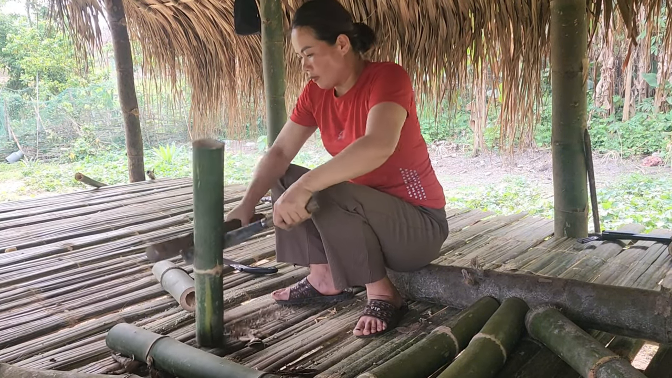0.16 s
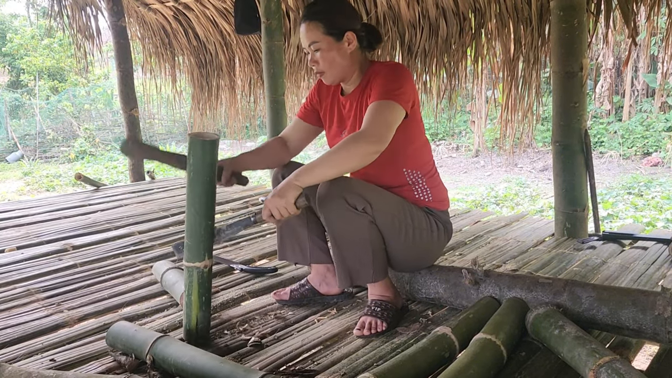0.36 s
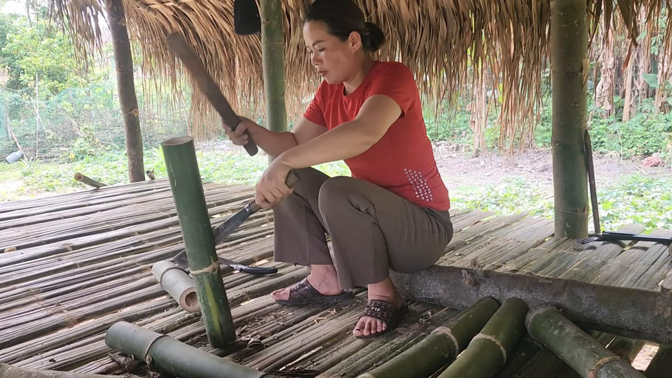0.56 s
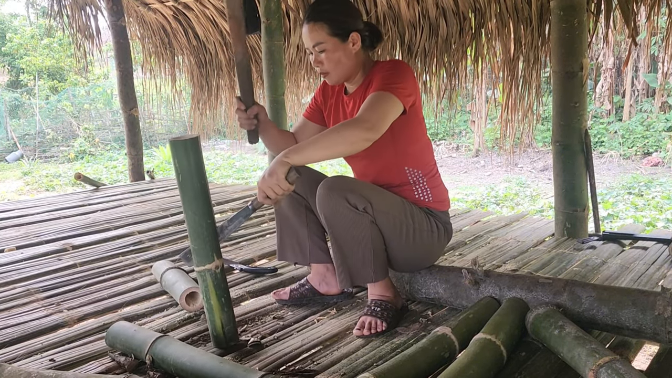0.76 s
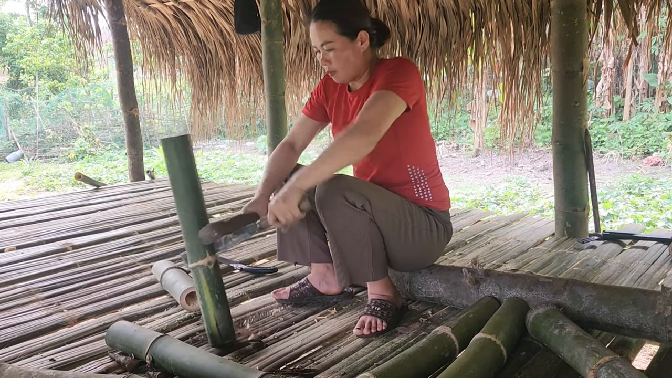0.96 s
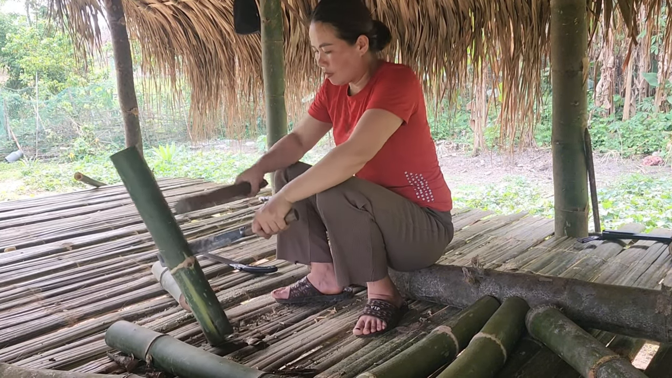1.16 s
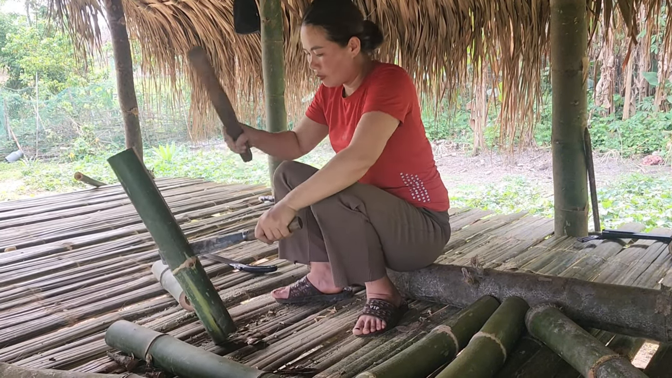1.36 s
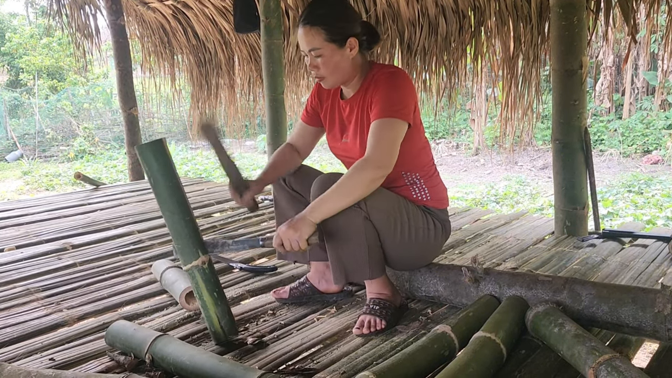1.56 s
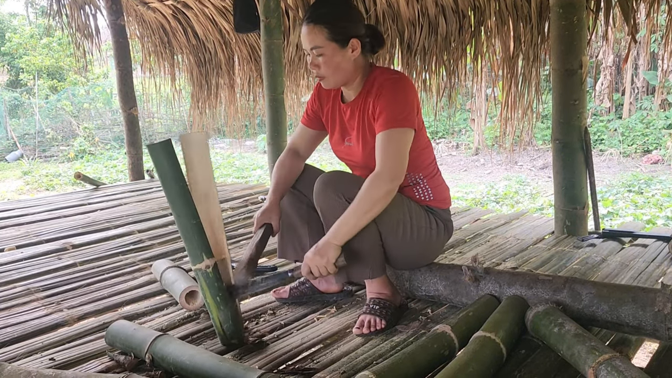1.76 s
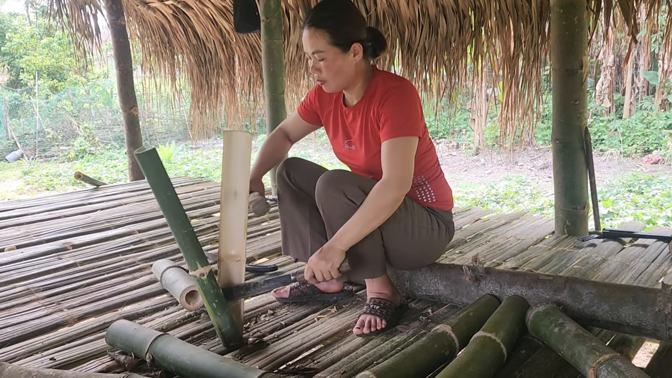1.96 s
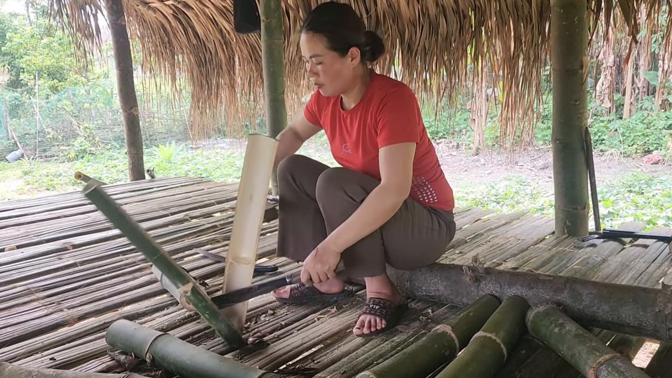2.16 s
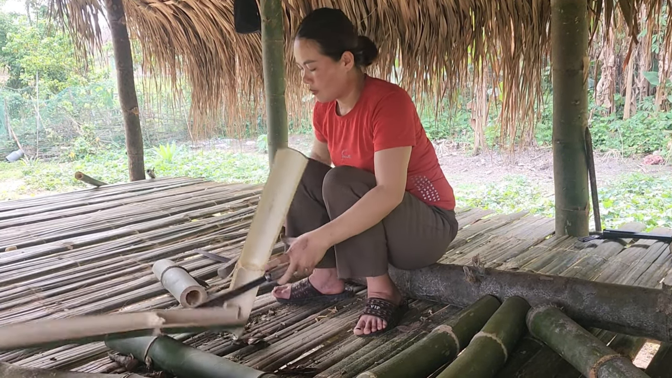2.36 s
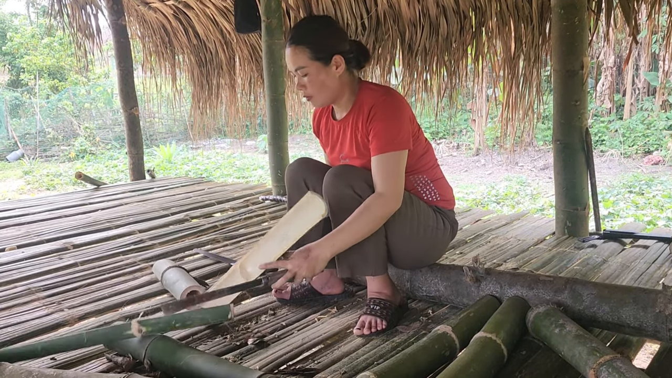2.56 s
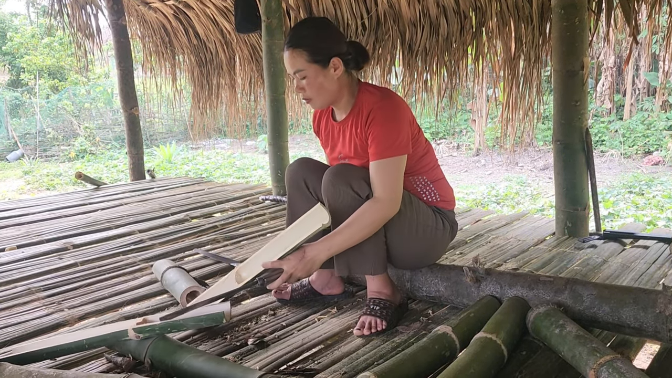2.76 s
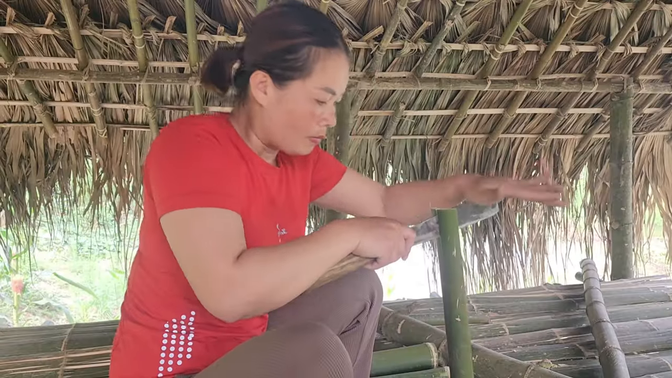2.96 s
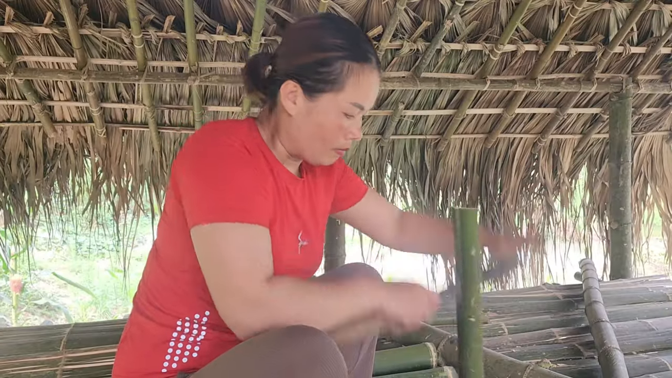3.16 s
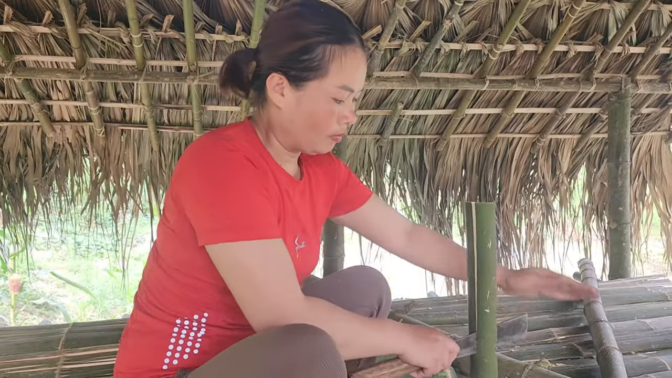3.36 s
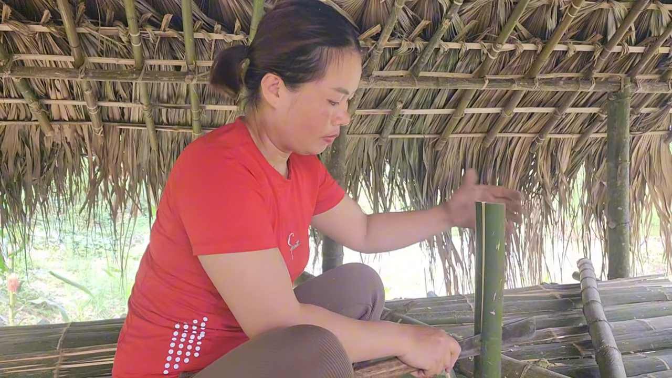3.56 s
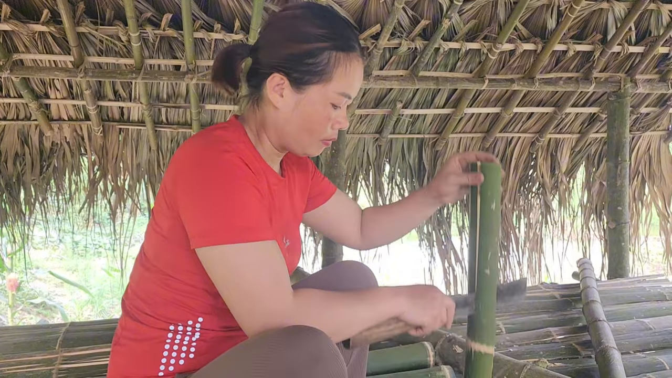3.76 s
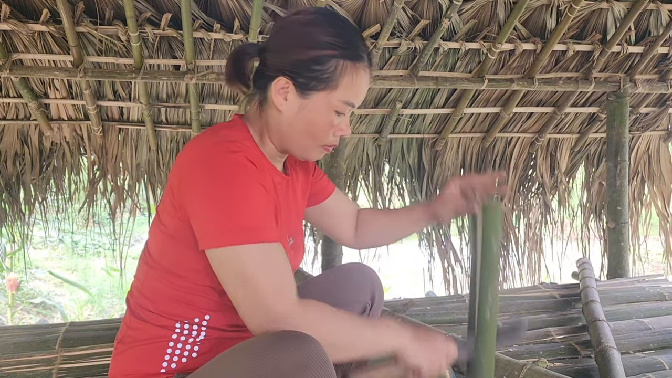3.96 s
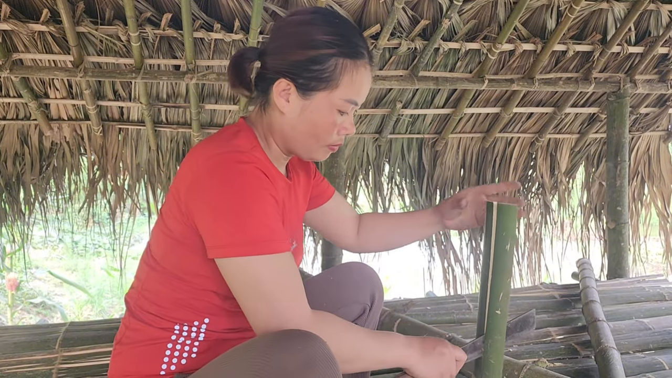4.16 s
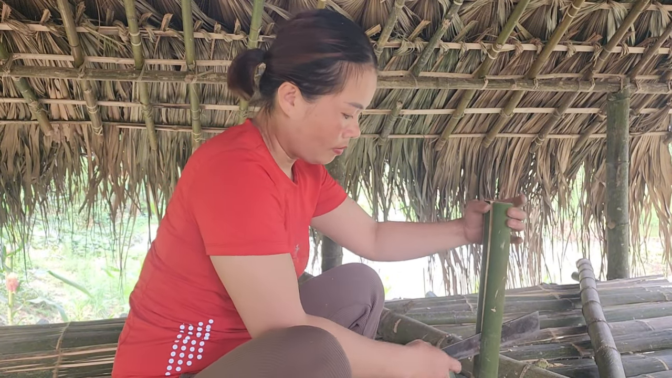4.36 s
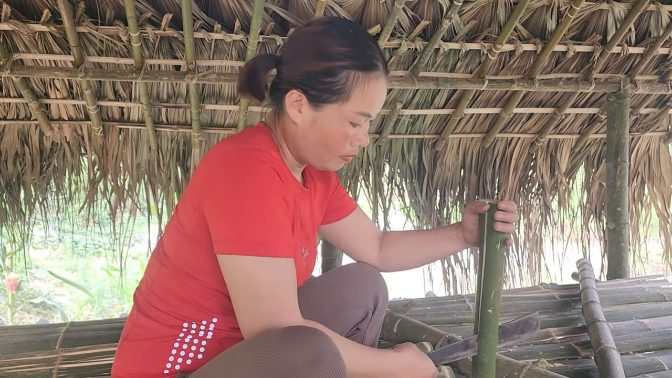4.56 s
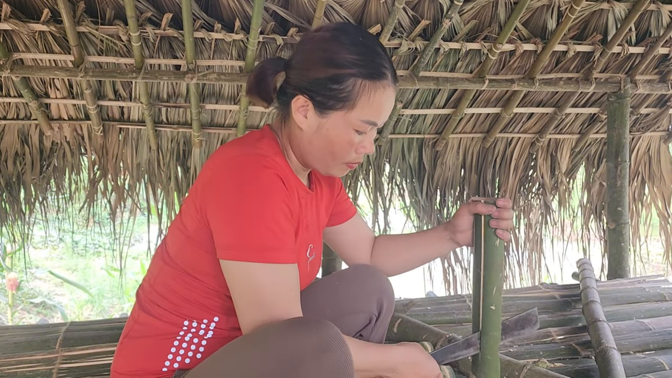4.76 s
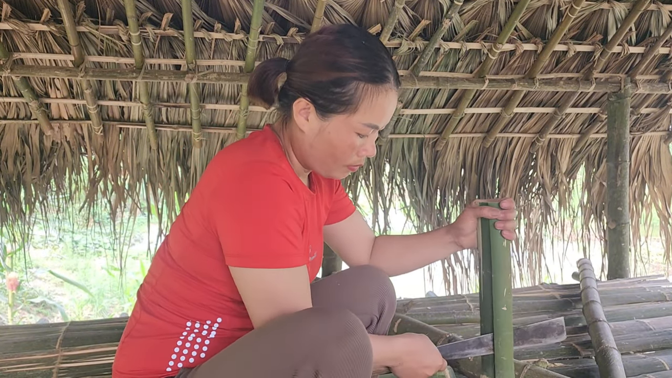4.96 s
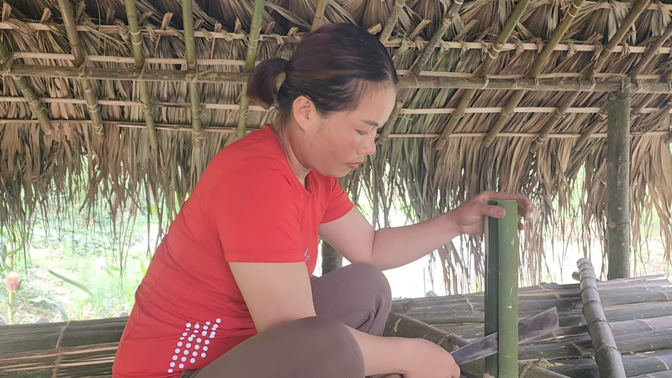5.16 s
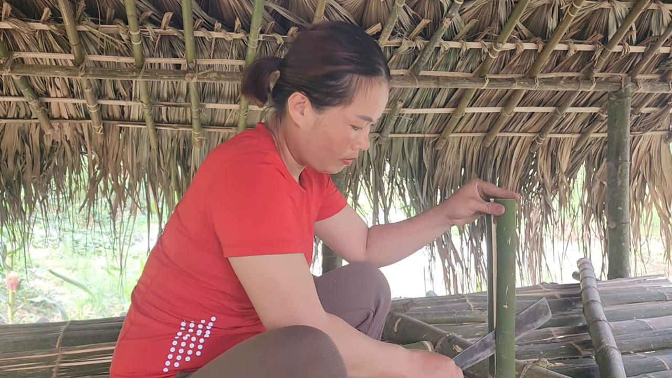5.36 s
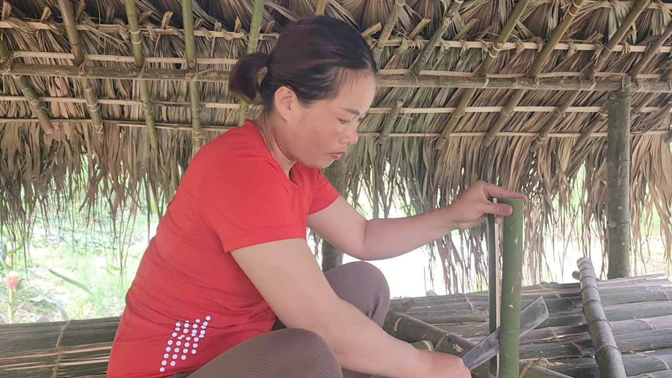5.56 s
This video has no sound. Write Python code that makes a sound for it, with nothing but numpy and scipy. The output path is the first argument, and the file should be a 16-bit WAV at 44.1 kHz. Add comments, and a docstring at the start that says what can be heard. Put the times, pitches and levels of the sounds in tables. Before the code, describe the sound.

In an open rural shelter, with a faint high insect hiss and a few far birds, bamboo is being split. Three dry knocks of a club on a machete come first, followed by the hollow, ringing clatter of a piece falling on slats. Then, nearer the stereo microphones, another cane crackles, takes one heavy knock that shakes the deck, and snaps and tears loudly as the blade twists.

```python
"""A slatted deck under a thatched roof, insects and faint birds in the fields around, on a close stereo pair.
A wooden club drives a machete down green bamboo in three blows, each cracking the culm and shaking the deck.
Fibres tear, and a stave topples, ringing and scraping as it bounces on the slats.
After a brief silence, from closer by: the blade is worked into another culm, knocked down,
and twisted until the fibres snap and tear."""
import sys
import numpy as np
from scipy import signal
from scipy.fft import rfft, irfft
from scipy.io import wavfile
from scipy.ndimage import uniform_filter1d

SR = 44100
rng = np.random.default_rng(int(sys.argv[2]) if len(sys.argv) > 2 else 0)


def wrap_up_sound(samples):
    """Save the sound to the file named by the first command line argument, as 16-bit audio."""
    columns = np.atleast_2d(samples).T
    # keep every value between -1 and 1, then stretch to whole-number steps
    tamed = np.clip(columns, -1, 1)
    steps = np.round(tamed * 32767).astype(np.int16)
    wavfile.write(sys.argv[1], SR, steps)


N = 251370
T = np.arange(SR // 2) / SR  # time within one short sound, s


def amp(db):
    """Decibels to gain."""
    return 10 ** (np.asarray(db) / 20)


def unit(x):
    """Scales to an rms of one."""
    return x / np.sqrt(np.mean(x ** 2) + 1e-20)


def read(points, hz):
    """Reads a table along a logarithmic frequency axis."""
    freqs, values = np.transpose(points)
    return np.interp(np.log(hz + 1), np.log(freqs + 1), values)


def add(mix, start_s, sound):
    """Mixes a stereo sound in at start_s."""
    part = mix[:, max(round(start_s * SR), 0):][:, :sound.shape[1]]
    part += sound[:, :part.shape[1]]


# How alike the two microphones hear the work: freq_hz, coherence
MIC_COHERENCE = [(100, 1), (400, 0.85), (1000, 0.8), (3000, 0.41), (8000, 0.17), (16000, 0.14)]
def coloured(pair, spectrum, diffuse=False, bass_db=0, treble_db=0):
    """Gives two unrelated signals one spectrum, the likeness of two close microphones and a tone tilt."""
    hz = np.fft.rfftfreq(pair.shape[1], 1 / SR)
    first, second = rfft(pair)
    coherence = np.sinc(hz / 1500) if diffuse else read(MIC_COHERENCE, hz)
    mid, side = first * np.sqrt(1 + coherence), second * np.sqrt(1 - coherence)
    shaped = np.array([mid + side, mid - side]) * amp(read(spectrum, hz)) * hz / np.hypot(hz, 20)
    shelves = amp(bass_db / (1 + (hz / 420) ** 4) + treble_db * hz ** 2 / (hz ** 2 + 5000 ** 2))
    return irfft(shaped * shelves, pair.shape[1]) / irfft(shaped).std()


def burst(spectrum, t60, bass_db=0, treble_db=0, hold_s=0):
    """Noise as a crowd of dense, unequal modes; the level holds for hold_s, then dies away."""
    t = T[:len(T) // 2]
    hz = np.fft.rfftfreq(len(t), 1 / SR)
    centres_hz = np.arange(0, SR / 2, 70)
    ripple_db = 2 * np.interp(hz, centres_hz, rng.standard_normal(len(centres_hz))) * hz / (hz + 1500)
    low_cut = hz ** 2 / (hz ** 2 + 40 ** 2)
    noise = coloured(rng.standard_normal((2, len(t))), spectrum, False, bass_db, treble_db)
    crowd = irfft(rfft(noise) * amp(ripple_db) * low_cut, len(t))
    envelope = amp(-60 * np.maximum(t - hold_s, 0) / t60) * (1 - np.exp(-t / 0.001))
    return np.pad(crowd * envelope, [(0, 0), (0, len(T) - len(t))])


def ring(modes, rise_s=0.00021):
    """Decaying modes; the higher ones reach the two microphones out of step."""
    out = np.zeros((2, len(T)))
    for hz, db, t60 in modes:
        phase, side = rng.random(2)
        skew = 0.8 * np.sign(side - .5) * np.arccos(read(MIC_COHERENCE, hz))
        out += amp(db - 60 * T / t60) * np.sin(2 * np.pi * (hz * T + phase) + np.array([[skew], [-skew]]))
    return out * (1 - np.exp(-T / rise_s))


def crackle(contour, spectrum, per_s, spread_db, grain_s=0.00098):
    """Tiny random ticks that follow a contour of (time_s, level_db); returns start time and sound."""
    times, levels_db = np.transpose(contour)
    t = np.arange(times[0], times[-1], 1 / SR)
    ticks = (rng.random(SR) < per_s / SR) * amp(spread_db * np.minimum(rng.exponential(1, SR), 3))
    grains = signal.lfilter([1], [1, -np.exp(-1 / (grain_s * SR))], ticks) * rng.standard_normal((2, SR))
    return times[0], coloured(grains, spectrum)[:, :len(t)] * amp(np.interp(t, times, levels_db))


def spurt(peak_s, db, rise_s, fade_s):
    """Level contour of a spurt: it builds to its height and dies away within 0.69 s."""
    return [(peak_s - rise_s, db - 14), (peak_s, db), (peak_s + min(fade_s, .69), db - 60)]


# The fields, heard from the farther and the closer position: freq_hz, density_db
FIELDS_FAR = [(20, -21.5), (50, -6), (100, -2.5), (250, -24.5), (1100, -23.5), (2000, -26), (3400, -25.5),
              (5600, -32), (6800, -24), (8250, -12), (9300, -20.5), (10500, -33.5), (13000, -37),
              (16000, -39.5)]
FIELDS_NEAR = [(15, -51.5), (25, -5.5), (53, 0), (108, -3), (190, -16.5), (249, -14.5), (531, -23.5),
               (988, -26), (2050, -23), (2760, -27), (3080, -22.5), (5570, -28), (8360, -7.5), (11000, -33),
               (16000, -34)]
def insects(spectrum, db, waver_db=0.52):
    """A steady chorus of insects over low moving air, gently wavering, all around the microphones."""
    t = np.arange(N) / SR
    waver = sum(np.sin(2 * np.pi * (hz * t + rng.random())) / np.sqrt(hz) for hz in np.geomspace(.7, 14, 12))
    return amp(db + waver_db * unit(waver)) * coloured(rng.standard_normal((2, N)), spectrum, diffuse=True)


def chirp(start_hz, end_hz, db, length_s=0.083):
    """A thin, slightly unsteady whistle, alike in both microphones."""
    glide = np.linspace(start_hz, end_hz, int(length_s * SR))
    waver = unit(uniform_filter1d(rng.standard_normal(SR), size=300))[:len(glide)]
    phase = 2 * np.pi * np.cumsum(glide * (1 + 0.0043 * waver)) / SR
    return np.ones((2, 1)) * amp(db) * np.hanning(len(glide)) * np.sin(phase)


# Two birds far out in the fields: start_s, interval_s, pitch_hz, level_db
BIRD_WHISTLES = [(0.0, .617, 2650, -75), (3.68, .87, 3050, -69.5)]
# A third distant bird: start_s, level_db
BIRD_SWEEPS = [(.042, -61), (.413, -62)]
def birds():
    """Two birds each whistle three times; a third sings high upward sweeps."""
    out = np.zeros((2, N))
    for start_s, interval_s, hz, db in BIRD_WHISTLES:
        for k in range(3):
            add(out, start_s + k * interval_s, chirp(hz, hz, db))
    for start_s, db in BIRD_SWEEPS:
        add(out, start_s, chirp(6900, 8200, db))
    return out


# Club on machete, the last blow from closer by; the culm's two rings change as the split deepens:
# start_s, crack_db, hold_s, crack_t60_s, deck_db, rebound_db,
# ring_t60_s, first_ring_hz, first_ring_db, second_ring_hz, second_ring_db
CLUB_BLOWS = [(0.1485, -10.5, 0.0019, 0.042, -31.5, -19.5, 0.031, 2023, -6.5, 3060, -12.5),
              (0.9324, -11, 0.005, 0.067, -33, -36.5, 0.04, 1050, -8, 562.7, -15.5),
              (1.625, -15, 0.00087, 0.079, -54, -45, 0.034, 780, -11, 612, -18.5),
              (3.9734, -11, 0.0013, 0.14, -16, -17.5, 0.062, 340, -8, 1464, -14)]
# The crack of the wood, one spectrum for each blow: freq_hz, density_db
CRACK_SPECTRA = [
    [(80, -2.5), (300, -1.5), (600, -2.5), (1050, -5), (1400, -2), (2100, 1), (2600, -4.5), (3200, 3.5),
     (4200, -3), (7500, -6.5), (11000, -15), (16000, -23)],
    [(80, -9), (300, -15), (550, 1.5), (1100, -2.5), (1300, -3.5), (2200, 0.5), (4000, -4), (7500, -6.5),
     (9500, -12.5), (16000, -15)],
    [(80, -3.5), (350, -14.5), (600, -12.5), (850, 7.5), (1300, 0.5), (2100, 6), (3000, 0), (7800, -3.5),
     (10000, -12.5), (16000, -11.5)],
    [(80, 13), (300, -0.5), (550, 7), (720, -8), (1000, 0), (1500, 4), (2200, 4), (4000, 1), (7500, -4),
     (10000, -11), (16000, -15.5)],
]
def blows():
    """Each blow cracks and shakes the deck; the culm rebounds with a duller crack, lands, and slats settle."""
    out = np.zeros((2, N))
    for (start_s, db, hold_s, t60, deck_db, rebound_db, *_), crack in zip(CLUB_BLOWS, CRACK_SPECTRA):
        add(out, start_s, amp(db) * burst(crack, t60, hold_s=hold_s) + deck_thump(deck_db))
        rebound = amp(rebound_db) * burst(crack, t60=0.12, bass_db=3.5, treble_db=-0.5)
        add(out, start_s + 0.013, rebound)
        landing = knock(rebound_db - 13, t60=0.26, resonance_hz=897, bass_db=10, treble_db=-8)
        add(out, start_s + 0.046, landing)
        add(out, *settling_slats(start_s, rebound_db - 39))
    return out


# The deck under the work: pitch_hz, level_db, t60_s
DECK_MODES = [(73.5, -11, 0.22), (89, -11, 0.13), (117.4, 1, .2), (131.5, -1, 0.14), (155, -13, 0.14),
              (238, -7, 0.032), (308, -10, .12)]
def deck_thump(db):
    """The deck takes up a blow over a few milliseconds."""
    sway = sum(amp(mode_db - 60 * T / t60) * np.sin(2 * np.pi * hz * T) for hz, mode_db, t60 in DECK_MODES)
    return amp(db) * sway * (1 - np.exp(-T / 0.0078))


def culm_rings(detune=0.056):
    """The struck culm rings briefly, damped by the hands; the slit parts each mode into a close pair."""
    out = np.zeros((2, N))
    for start_s, *_, t60, first_hz, first_db, second_hz, second_db in CLUB_BLOWS:
        modes = [(first_hz, first_db, t60), (second_hz, second_db, t60)]
        partners = [(hz * (1 + detune), db - 6, t60) for hz, db, _ in modes]
        add(out, start_s, ring(modes + partners, rise_s=0.00086))
    return out


# Bamboo against the slats: freq_hz, density_db
SLAT_SPECTRUM = [(80, -24), (300, 2.5), (900, -1.5), (1800, -1), (3000, -3.5), (4500, -7.5), (8000, -17.5),
                 (16000, -32)]
def settling_slats(start_s, db, length_s=0.55, fade_db=17.5):
    """A bouncing culm sets loose slats ticking."""
    contour = [(start_s, db), (start_s + length_s, db - fade_db)]
    return crackle(contour, SLAT_SPECTRUM, per_s=68, spread_db=2, grain_s=.009)


# Reverberation under the roof: freq_hz, t60_s
THATCH_DECAY = [(80, 0.73), (250, 0.41), (700, .42), (2000, 0.17), (6000, 0.33), (12000, 0.16),
                (16000, 0.55)]
def shelter_echoes(sound, early_db=-9, late_db=-15):
    """Quick echoes from deck and posts, then a short soft tail under the thatch."""
    late_spectrum = [(100, 8.0), (700, -2.9), (3000, -7.0), (16000, -2)]
    early_spectrum = [(100, -7), (1000, 2.0), (3000, -2), (7000, 1.0), (16000, -4)]
    noise = coloured(rng.standard_normal((2, len(T))), late_spectrum, diffuse=True)
    hz, t, bands = signal.stft(noise, SR, nperseg=256)
    bands *= amp(-60 * t / read(THATCH_DECAY, hz)[:, None])
    late = signal.istft(bands, SR, nperseg=256)[1][:, :len(T)]
    late *= np.clip((T - .008) / 0.004, 0, 1)
    early = coloured(rng.standard_normal((2, len(T))), early_spectrum, diffuse=True)
    early *= amp(-60 * T / 0.14) * (T > .003)
    echo = amp(early_db) * early / np.linalg.norm(early[0]) + amp(late_db) * late / np.linalg.norm(late[0])
    return signal.oaconvolve(sound, echo, axes=1)[:, :N]


# Lightly struck wood: freq_hz, density_db
WOOD_SPECTRUM = [(60, -11.5), (200, -4), (550, 1), (1200, -0.5), (2200, -3), (4000, -5.5), (7500, -8),
                 (10000, -19.5), (16000, -16)]
def knock(db, t60, resonance_hz, bass_db, treble_db):
    """A knock with one main resonance; the heavier and longer it is, the more it shakes the deck."""
    hz = np.geomspace(60, 16000, 200)
    resonance_db = 8 * np.exp(-(np.log2(hz / resonance_hz) / 0.12) ** 2)
    spectrum = np.c_[hz, read(WOOD_SPECTRUM, hz) + resonance_db]
    deck_db = db + bass_db + 10 * np.log10(t60) - 4.5
    return amp(db) * burst(spectrum, t60, bass_db, treble_db) + deck_thump(deck_db)


# Knocks in front of the microphones: start_s, level_db, t60_s, resonance_hz, bass_db, treble_db
HANDLING_KNOCKS = [(0.554, -49.5, 0.19, 2530, 4.5, -12), (1.785, -42.5, 0.1, 1236, 2, -3.5),
                   (1.9679, -40.5, 0.096, 967, -6.5, -44), (2.225, -45.5, .06, 1180, -15.5, 17.5),
                   (2.93, -39, 0.16, 540, 19, 0.5), (3.136, -20, 0.042, 1970, 1.5, 4.5),
                   (3.204, -34, 0.42, 308, 11, -6), (3.314, -34.5, 0.14, 2010, 8.5, -0.5),
                   (3.625, -56, 0.3, 2130, 2, 12), (4.1284, -36, 0.084, 4644, -12, 3),
                   (4.8226, -17, .046, 1240, 3.5, -26), (4.8429, -18, 0.017, 1340, 0.5, -2),
                   (4.9343, -40.5, 0.074, 2620, -17, 3), (5.2184, -49, 0.36, 2100, 11, -13.5)]
def handling():
    """Club, blade and culm knock together as they are handled."""
    out = np.zeros((2, N))
    for start_s, *stroke in HANDLING_KNOCKS:
        add(out, start_s, knock(*stroke))
    return out


# Crackling spurts, loudest from close by: peak_s, level_db, rise_s, fade_s
CRACKLE_SPURTS = [(1.77, -58, .08, 0.48), (2.11, -68, .25, .4), (2.203, -49, 0.0052, 0.17),
                  (3.178, -24.5, .05, 0.19), (4.058, -49.5, 0.028, 0.81), (4.712, -42.5, .06, 0.26),
                  (4.749, -30, 0.021, 0.21), (4.837, -15.5, 0.035, .1), (5.276, -50.5, 0.11, 0.28)]
# Bright crackle of green bamboo: freq_hz, density_db
FIBRE_SPECTRUM = [(100, -21.5), (700, -16), (1200, -1.5), (1650, -7.5), (2300, 2), (3400, 6.5), (5000, 4),
                  (8000, 0.5), (10500, -4), (13000, 4), (16000, -5)]
def crackling_spurts():
    """Fibres tearing, a faint wash dying after the last blow, the blade rubbing."""
    out = np.zeros((2, N))
    for row in CRACKLE_SPURTS:
        add(out, *crackle(spurt(*row), FIBRE_SPECTRUM, per_s=1800, spread_db=3.5))
    return out


# The stave falling on the deck, from the farther position: start_s, ring_db, favoured_hz, clack_db, deck_db
STAVE_BOUNCES = [(2.3329, -32, 1350, -33.5, -40), (2.367, -37, 1800, -54, -57),
                 (2.3908, -16.5, 1105, -24, -35), (2.488, -45, 870, -28, -39),
                 (2.592, -39, 885, -40.5, -70), (2.6028, -21, 2630, -23.5, -38),
                 (2.683, -51, 810, -43, -45), (2.761, -57.5, 2000, -58, -49)]
# The loose stave: pitch_hz, level_db, t60_s
STAVE_MODES = [(455, -3.5, 0.53), (583.7, -3.5, 0.32), (976, 3, 0.067), (960, -16.5, 0.5), (1342, -9, 0.14),
               (1646, -0.5, 0.11), (1735, -9.5, 0.18), (2214, 2, 0.06), (2400, -7.5, 0.13),
               (2700, -20, 0.056), (3345, -11.5, 0.095), (4180, 1.5, 0.017)]
def bouncing_stave(selectivity=1.73):
    """The free stave rings much longer than the held culm; each contact point favours other modes."""
    out = np.zeros((2, N))
    for start_s, ring_db, favoured_hz, clack_db, deck_db in STAVE_BOUNCES:
        modes = []
        for hz, db, t60 in STAVE_MODES:
            mismatch = selectivity * (hz / favoured_hz - favoured_hz / hz)
            modes.append((hz, db - 10 * np.log10(1 + mismatch ** 2), t60))
        clack = amp(clack_db) * burst(SLAT_SPECTRUM, t60=0.081)
        add(out, start_s, clack + amp(ring_db) * ring(modes) + deck_thump(deck_db))
    return out


def scraping_stave(first_db=-40.5, slowing_db_per_s=45.5, rise_s=0.0033):
    """The stave scrapes over the slats after every bounce, more weakly as it slows."""
    out = np.zeros((2, N))
    for start_s, *_ in STAVE_BOUNCES:
        db = first_db - slowing_db_per_s * (start_s - STAVE_BOUNCES[0][0])
        contour = spurt(start_s + rise_s, db, rise_s, fade_s=0.43)
        add(out, *crackle(contour, SLAT_SPECTRUM, per_s=2200, spread_db=-1.0))
    return out


# The second culm giving way, close to the microphones: start_s, snap_db, blade_db
FIBRE_SNAPS = [(3.112, -50.5, -54.5), (3.126, -16.5, -35.5), (3.1731, -35.5, -31), (3.179, -23.5, -48),
               (3.191, -19, -57), (4.6328, -33.5, -49.5), (4.6827, -29, -44), (4.7083, -30.5, -54),
               (4.7373, -11, -34.5), (4.804, -19.5, -46), (4.819, -28, -33), (4.8212, -7, -26),
               (4.8427, -13.5, -16)]
def snapping():
    """Bundles of fibres snap as the split runs on."""
    out = np.zeros((2, N))
    for start_s, db, _ in FIBRE_SNAPS:
        add(out, start_s, amp(db) * burst(FIBRE_SPECTRUM, t60=0.025))
    return out


# The machete wedged in the culm: pitch_hz, level_db, t60_s
BLADE_MODES = [(1370, -4.5, 0.028), (1340, -1.5, 0.032), (2120, 2, 0.032), (2145, 13, 0.025),
               (2546, -11.5, .03), (3270, -3, 0.035), (4600, -9.5, 0.033)]
def blade_rings():
    """Each snap sets the held blade ringing briefly."""
    out = np.zeros((2, N))
    for start_s, _, blade_db in FIBRE_SNAPS:
        add(out, start_s, amp(blade_db) * ring(BLADE_MODES))
    return out


def scene(pause_start_s=2.867, pause_end_s=2.897):
    """The work lies a little left at first; after the pause it is closer and a little right."""
    t = np.arange(N) / SR
    near = t > pause_start_s
    hits = blows() + handling()
    rings = culm_rings() + blade_rings()
    crackles = snapping() + crackling_spurts() + scraping_stave()
    bounces = bouncing_stave()
    left, right = hits + rings + crackles + bounces
    late_left, late_right = np.roll([left, right], 4, axis=1)  # the farther microphone lags 4 samples
    direct = np.where(near, [late_left, right], [left * amp(0.82), late_right])
    echoes = shelter_echoes(hits + amp(-5) * rings + amp(-3) * crackles + amp(-2) * bounces)
    outdoors = np.where(near, insects(FIELDS_NEAR, db=-53.5), insects(FIELDS_FAR, db=-63.5)) + birds()
    return (direct + echoes + outdoors) * ((t < pause_start_s) | (t > pause_end_s))


def record(dry, cutoff_hz=16100):
    """The loudest peaks round off at full scale, and the highest treble is cut."""
    rounded = dry / (1 + dry ** 6) ** (1 / 6)
    lowpass = signal.firwin(255, cutoff_hz, window=("kaiser", 7), fs=SR)
    return signal.oaconvolve(rounded, lowpass[None], "same")


dry = scene()
out = record(dry)
wrap_up_sound(out)
```